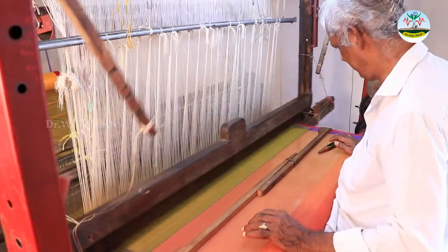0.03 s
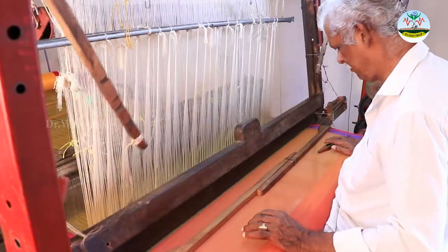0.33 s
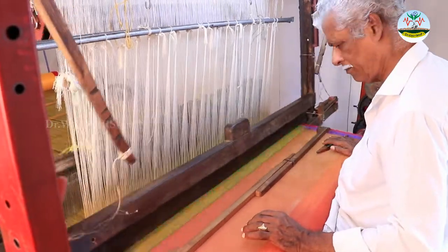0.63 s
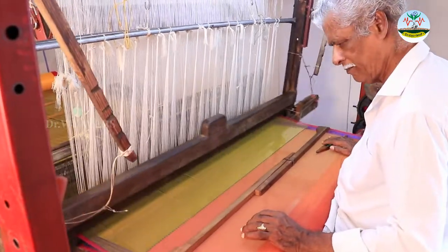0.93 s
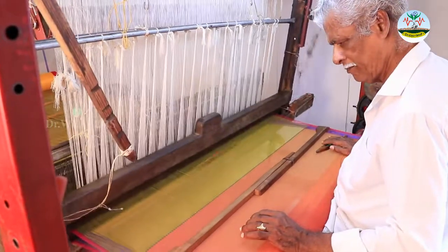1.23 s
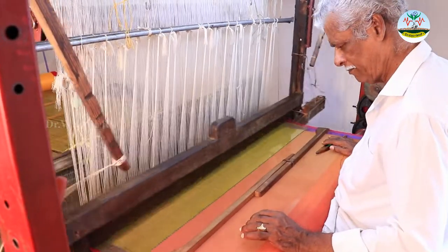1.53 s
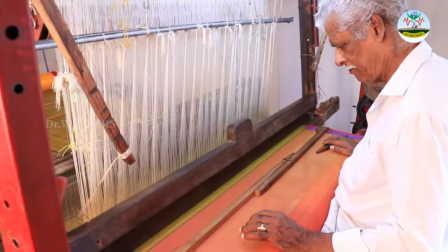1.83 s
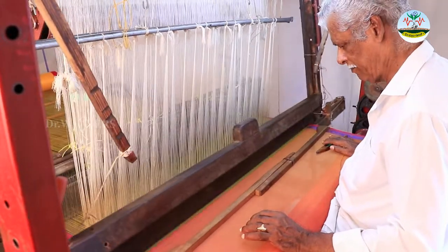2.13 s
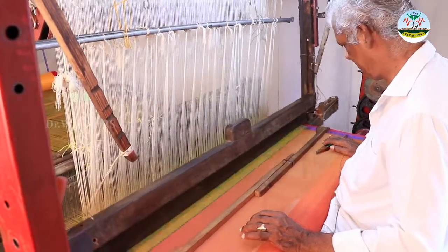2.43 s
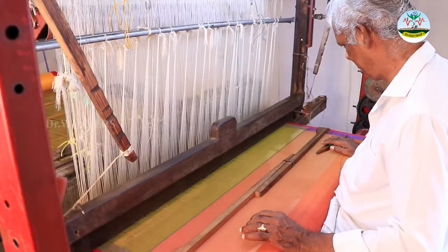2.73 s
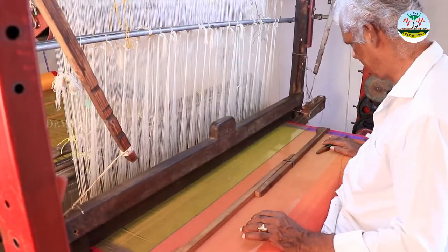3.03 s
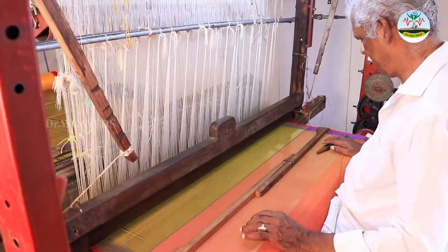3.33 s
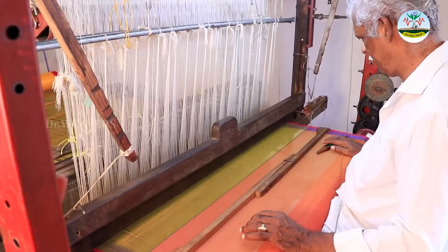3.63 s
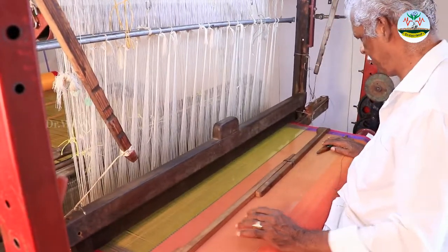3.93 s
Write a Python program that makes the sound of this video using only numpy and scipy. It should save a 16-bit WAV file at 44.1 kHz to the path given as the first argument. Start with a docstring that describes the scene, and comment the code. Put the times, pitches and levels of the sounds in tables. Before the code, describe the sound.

A wooden handloom knocks, rattles and squeaks in a small room, then comes to rest.

```python
"""Wooden knocks and rumbles, with rubs, creaks, squeaks and swishes between, then a last dull clunk:
a handloom works through a pick in a small hard-walled room and comes to rest. Beater and picker knock;
the struck shuttle rings, rumbles across and lands in its box. Cords, pivots and warp threads sound as
streams of tiny contacts; joints squeak on wavering tones. The close mono microphone overloads."""
import sys
import numpy as np
from scipy import signal
from scipy.fft import rfft, irfft
from scipy.io import wavfile
from scipy.ndimage import uniform_filter1d

SR = 44100
rng = np.random.default_rng(int(sys.argv[2]) if len(sys.argv) > 2 else 0)


def transcribe(u):
    """Save the signal u as a 16-bit wav file named by the first command-line argument.

    u: samples, shape (n,) or (channels, n), limited to [-1, 1]; the rate is SR.
    q: integer samples, one column per channel.
    """
    v = np.clip(np.atleast_2d(u).T, -1, 1)
    q = np.round(v * 32767).astype(np.int16)
    wavfile.write(sys.argv[1], SR, q)


N = 176400
EVENT_N = 44100
T = np.arange(EVENT_N) / SR
HZ = np.maximum(np.fft.rfftfreq(EVENT_N, 1 / SR), 1)
SCENE_HZ = np.maximum(np.fft.rfftfreq(N, 1 / SR), 1)
CONTACTS_PER_S, SLIPS_PER_S = 1500, 780


def from_db(db):
    """Decibels to gain."""
    return 10 ** (np.asarray(db) / 20)


def unit(x):
    """Scale to energy 1."""
    return x / np.sqrt(np.sum(x ** 2) + 1e-20)


def at_hz(points, hz):
    """Interpolate a table over log frequency."""
    f, value = np.transpose(points)
    return np.interp(np.log(hz), np.log(f), value)


def resonances(modes):
    """Response in dB of parallel steep-sided resonances."""
    power = sum(from_db(db) ** 2 / (1 + ((HZ ** 2 - hz ** 2) / (HZ * width_hz)) ** 2) ** 2
                for hz, width_hz, db in modes)
    return 10 * np.log10(power + 1e-9)


def colour(x, response_db, tilt_db_oct=0):
    """Minimum-phase filter, tilted about 2 kHz."""
    tilt_db = tilt_db_oct * np.log2(np.maximum(HZ, 200) / 2000)
    cepstrum = irfft(np.log(from_db(response_db + tilt_db)))
    cepstrum[1:EVENT_N // 2] *= 2
    cepstrum[EVENT_N // 2 + 1:] = 0
    return irfft(rfft(x) * np.exp(rfft(cepstrum)))


def grains(rate_per_s, spread_db=3):
    """Random tiny contacts of uneven size, RMS 1."""
    sizes = from_db(spread_db * np.minimum(rng.exponential(1, EVENT_N), 4))
    signs = rng.choice([-1, 1], EVENT_N)
    hits = rng.random(EVENT_N) < rate_per_s / SR
    return unit(sizes * signs * hits) * np.sqrt(EVENT_N)


def stroke(length_s, attack_s, release_s):
    """Envelope: swell, then decay from length_s on."""
    swell = np.sin(np.pi / 2 * np.minimum(T / attack_s, 1)) ** 2
    return swell * np.exp(-np.maximum(T - length_s, 0) / release_s)


def room_tail(build_up_s=0.0044):
    """Diffuse wall reflections; each octave dies at its own rate."""
    # reverberation time: f/Hz, T60/s
    t60 = [(250, 0.28), (1000, 0.53), (3000, 0.74), (8000, 0.43), (15000, 0.053)]
    octaves_hz = np.geomspace(125, 16000, 8)
    white = rfft(rng.standard_normal(EVENT_N))
    tail = np.zeros(EVENT_N)
    for hz in octaves_hz:
        band = np.interp(np.log(HZ), np.log(octaves_hz), octaves_hz == hz)
        tail += irfft(white * band) * from_db(-60 * T / at_hz(t60, hz))
    return unit(tail * np.minimum(T / build_up_s, 1))


def add(out, t_s, db, sound, room_db):
    """Mix in an event with its reverberation; db sets the RMS of its loudest 25 ms."""
    reverb = signal.fftconvolve(sound, room_tail())[:EVENT_N]
    heard = unit(sound) + from_db(room_db) * unit(reverb)
    heard *= from_db(db) / np.sqrt(uniform_filter1d(heard ** 2, size=1100).max() + 1e-20)
    start = int(t_s * SR)
    first, last = max(start, 0), min(start + EVENT_N, N)
    out[first:last] += heard[first - start:last - start]


def friction(strokes, body_db, rate_per_s, attack_s=0.018, detune=0.015):
    """Streams of small contacts drive one body; a random shift per stroke stands for the load."""
    out = np.zeros(N)
    for t_s, length_s, db, tilt_db_oct in strokes:
        shifted_db = np.interp(HZ * (1 + detune * rng.standard_normal()), HZ, body_db)
        force = grains(rate_per_s) * stroke(length_s, attack_s, release_s=0.0073)
        add(out, t_s, db, colour(force, shifted_db, tilt_db_oct), room_db=3)
    return out


def frame_rumbles():
    """The beater frame shudders and the shuttle runs across."""
    # rumbles: t/s, length/s, level/dB, tilt/(dB/oct)
    strokes = [(-.03, 0.2, -14.5, 4.5), (.2, 0.14, -18, 5.5), (1.085, 0.24, -13.5, -3.5),
               (1.22, 0.039, -9.5, -1.5), (1.32, 0.086, -23, -5), (1.57, 0.13, -8.5, 5.5),
               (1.7, 0.14, -15, 5.5), (1.9, 0.076, -15.5, 4)]
    # frame response: f/Hz, level/dB
    frame = [(150, -43.5), (280, -14.5), (420, -6), (750, 7.5), (1400, 7.5), (2500, -3.5), (5000, -13.5),
             (15500, -34)]
    return friction(strokes, at_hz(frame, HZ), CONTACTS_PER_S)


def room_tone(rms_db=-38):
    """Steady, dull background noise."""
    # room tone spectrum: f/Hz, level/dB
    air = [(25, -5.5), (90, 15), (200, 9.5), (450, -13.5), (700, -7), (1300, -19), (2800, -22.5),
           (15500, -45.5)]
    spectrum = rfft(rng.standard_normal(N)) * from_db(at_hz(air, SCENE_HZ))
    return from_db(rms_db) * np.sqrt(N) * unit(irfft(spectrum, N))


def wood_knocks(crack_s=0.0039, chatter_db=-14.5, ring_width_share=0.15):
    """Each blow cracks, loose parts chatter and the struck part rings briefly."""
    # blows: t/s, level/dB, tilt/(dB/oct), chatter decay/s, ring f/Hz, ring level/dB
    blows = [(.001, -7.5, -3, 0.034, 1660, -33.5), (0.189, -7, 3, 0.0047, 2345, -6),
             (0.3903, -14.5, -5, 0.009, 1045, -1), (1.0662, -4.5, 1, 0.07, 1490, -9),
             (1.1943, -2, -0.5, 0.11, 2450, -20), (1.4248, -8.5, 0, 0.0034, 1480, -7.5),
             (1.4945, -1.5, 3, 0.014, 3040, -10), (1.8494, -6.5, 2.5, 0.004, 2350, -7)]
    # wood response: f/Hz, level/dB
    wood = [(150, -65.5), (350, -30.5), (600, -13), (1100, -1.5), (2700, -1), (8000, -9.5), (15500, -20.5)]
    out = np.zeros(N)
    for t_s, db, tilt_db_oct, chatter_s, ring_hz, ring_db in blows:
        crack = rng.standard_normal(EVENT_N) * np.exp(-T / crack_s)
        chatter = from_db(chatter_db) * grains(CONTACTS_PER_S) * np.exp(-T / chatter_s)
        force = crack + chatter
        body = colour(force, at_hz(wood, HZ), tilt_db_oct)
        ring = colour(force, resonances([(ring_hz, ring_width_share * ring_hz, 0)]))
        add(out, t_s, db, unit(body) + from_db(ring_db) * unit(ring), room_db=4.5)
    return out


def cord_rubs():
    """Cords drag over the rods in small slips."""
    # rubs: t/s, length/s, level/dB, tilt/(dB/oct)
    strokes = [(.4, 0.1, -29, 2), (.545, 0.07, -21.5, -3), (2.02, 0.17, -21, -4), (2.135, 0.084, -20.5, -2),
               (2.345, 0.1, -25.5, -3.5), (2.42, 0.11, -22, -3.5)]
    # cord resonances: f/Hz, width/Hz, level/dB
    modes = [(1089, 200, -7.5), (1313, 170, -3), (1517, 90, -5), (1995, 250, -8.5), (2980, 490, -6.5),
             (3860, 2400, -8), (6350, 900, -13.5)]
    return friction(strokes, resonances(modes), SLIPS_PER_S)


def pivot_creaks():
    """Slips in the pivots excite narrow resonances."""
    # creaks: t/s, length/s, level/dB, tilt/(dB/oct)
    strokes = [(.648, 0.084, -16, 1), (.765, 0.087, -21.5, 8), (2.622, 0.026, -35, -14.5),
               (2.795, 0.147, -33.5, -0.5), (2.975, 0.13, -36, -24)]
    # pivot resonances: f/Hz, width/Hz, level/dB
    modes = [(1105, 110, 0), (1608, 90, -2), (1920, 110, -7), (1992, 130, 0.5), (2480, 130, -7),
             (3190, 170, -9.5), (4110, 130, -11), (4600, 2200, -21.5)]
    return friction(strokes, resonances(modes), SLIPS_PER_S, attack_s=0.04)


def warp_swishes():
    """Warp threads slide past each other; dense contacts merge into hiss."""
    # swishes: t/s, length/s, level/dB, tilt/(dB/oct)
    strokes = [(.705, 0.048, -18.5, 10), (.91, 0.15, -17, 7.5), (2.455, 0.14, -24.5, 22),
               (2.508, 0.045, -20, 6), (2.64, 0.02, -23, 6), (2.71, 0.13, -31, 2)]
    # thread response: f/Hz, level/dB
    threads = [(300, -19.5), (1400, -8.5), (3000, 2), (5000, -8.5), (8500, -14), (11500, -26.5),
               (15500, -32)]
    return friction(strokes, at_hz(threads, HZ), rate_per_s=7800)


def squeaks_and_shuttle_ring(flutter_db=2, octave_db=-7.5, octave_top_hz=5000):
    """Wavering tones: joint squeaks, and the shuttle's high ring after the picker strikes it."""
    # tones (shuttle at 1.508 s): t/s, length/s, level/dB, f/Hz, RMS pitch waver/fraction, fade/s
    tones = [(.705, .04, -22.5, 1840, 0.014, 0.09), (0.71, 0.027, -21, 3416, .006, 0.052),
             (0.754, 0.03, -8, 13330, 0.0015, .032), (0.855, 0.017, -19.5, 13260, 0.003, 0.067),
             (.922, 0.06, -16, 1478, 0.031, .15), (1.508, 0.099, -17.5, 4990, 0.022, 0.036),
             (1.715, 0.08, -14, 2019, 0.0012, 0.038), (2.776, 0.11, -18, 4175, 0.0072, 0.049),
             (2.845, .06, -35.5, 1570, .02, 0.063)]
    out = np.zeros(N)
    for t_s, length_s, db, hz, roughness, fade_s in tones:
        slow_noise = uniform_filter1d(rng.standard_normal((2, EVENT_N)), size=180)
        waver, flutter = (unit(row) * np.sqrt(EVENT_N) for row in slow_noise)
        phase = 2 * np.pi * np.cumsum(hz * (1 + roughness * waver)) / SR
        tone = np.sin(phase) + from_db(octave_db) * np.sin(2 * phase) * (2 * hz < octave_top_hz)
        envelope = from_db(flutter_db * flutter) * stroke(length_s, attack_s=0.022, release_s=fade_s)
        add(out, t_s, db, tone * envelope, room_db=-11)
    return out


def wood_clunks():
    """Dull wooden clunks: the low ring of the picker blows, and a last clunk as the loom stops."""
    # clunks: t/s, length/s, level/dB, tilt/(dB/oct)
    strokes = [(1.44, 0.032, -21, -4), (1.487, 0.04, -11.5, 9), (3.32, 0.067, -22.5, -6.5)]
    # low wood resonances: f/Hz, width/Hz, level/dB
    modes = [(517.6, 74, -3), (665, 440, -11.5), (768, 100, -4), (1090, 110, -16), (1500, 600, -19.5)]
    return friction(strokes, resonances(modes), SLIPS_PER_S, attack_s=0.04)


def rod_clack():
    """A light rod clacks faintly as the loom stops."""
    # clack: t/s, length/s, level/dB, tilt/(dB/oct)
    strokes = [(3.172, 0.049, -42.5, -1)]
    # rod resonances: f/Hz, width/Hz, level/dB
    modes = [(2890, 540, -6), (4530, 5000, -25), (7300, 530, -13)]
    return friction(strokes, resonances(modes), SLIPS_PER_S, attack_s=0.04)


def scene():
    """The loom in its room, the same in both channels."""
    loom = (frame_rumbles() + wood_knocks() + cord_rubs() + pivot_creaks()
            + warp_swishes() + squeaks_and_shuttle_ring() + wood_clunks() + rod_clack())
    return np.tile(loom + room_tone(), (2, 1))


def record(dry):
    """Microphone overload flattens the peaks; the bass is thinned and the top cut."""
    # bass cut: f/Hz, gain/dB
    bass_cut = [(200, -16), (380, 1)]
    ceiling, cutoff_hz = 0.9, 16000
    clipped = dry / (1 + (dry / ceiling) ** 4) ** (1 / 4)
    thinned = irfft(rfft(clipped) * from_db(at_hz(bass_cut, SCENE_HZ)), N)
    lowpass = signal.ellip(8, 0.05, 50, cutoff_hz, fs=SR, output="sos")
    return signal.sosfiltfilt(lowpass, thinned)


dry = scene()
out = record(dry)
transcribe(out)
```